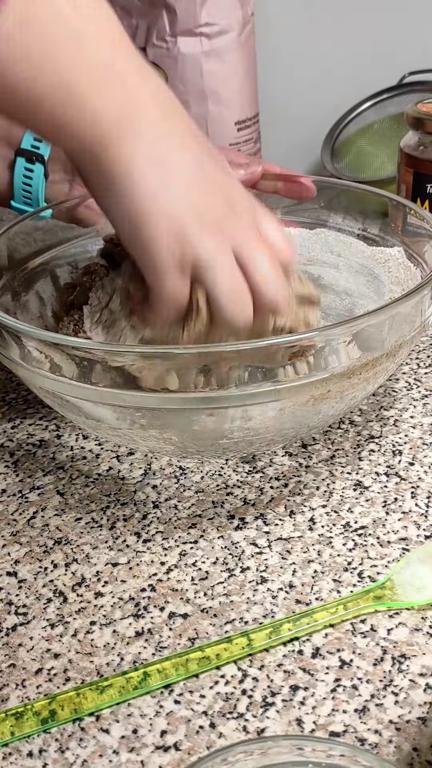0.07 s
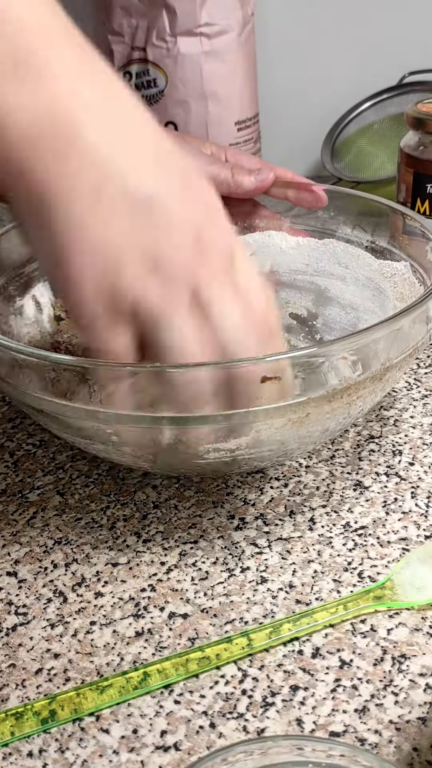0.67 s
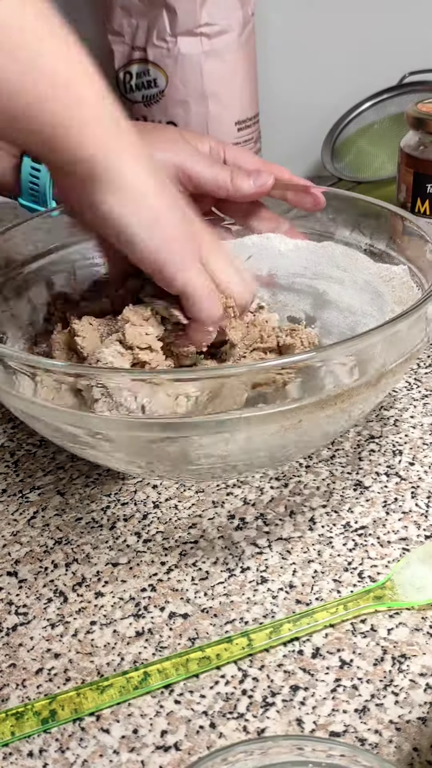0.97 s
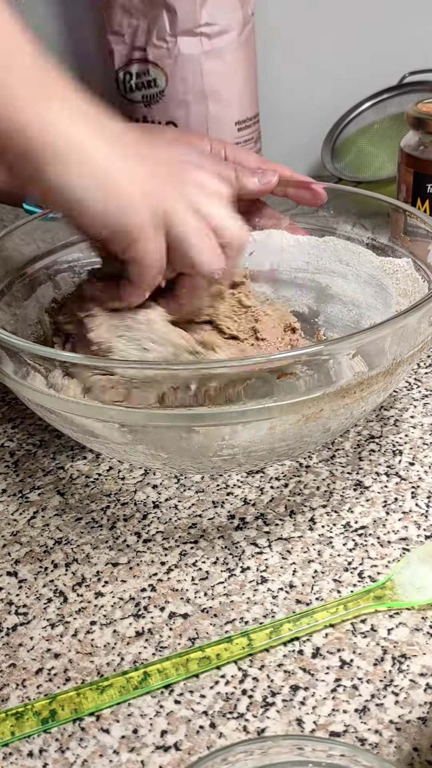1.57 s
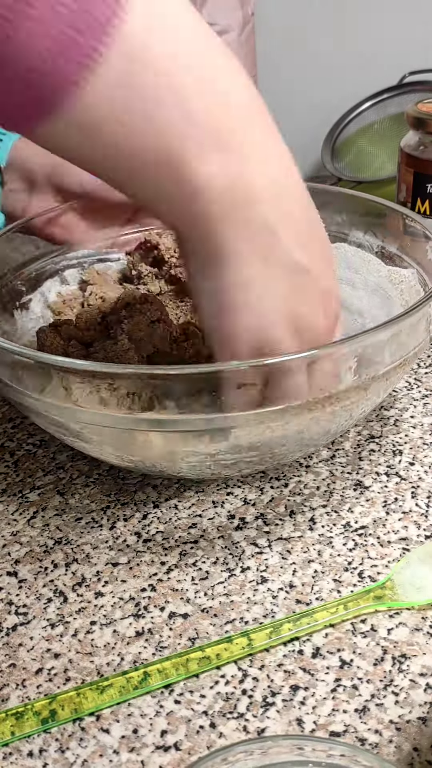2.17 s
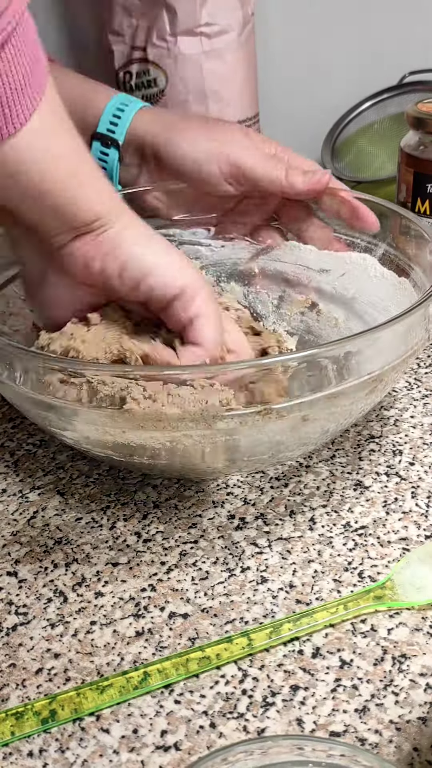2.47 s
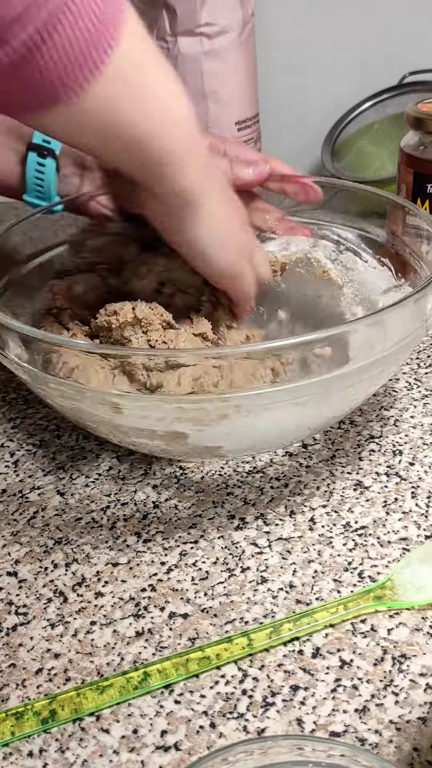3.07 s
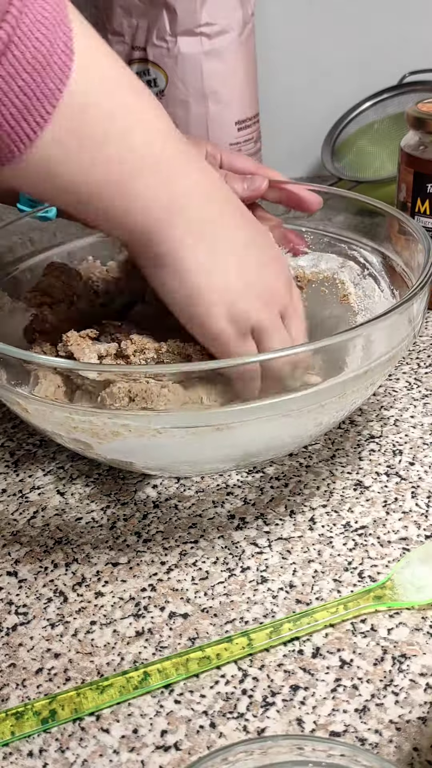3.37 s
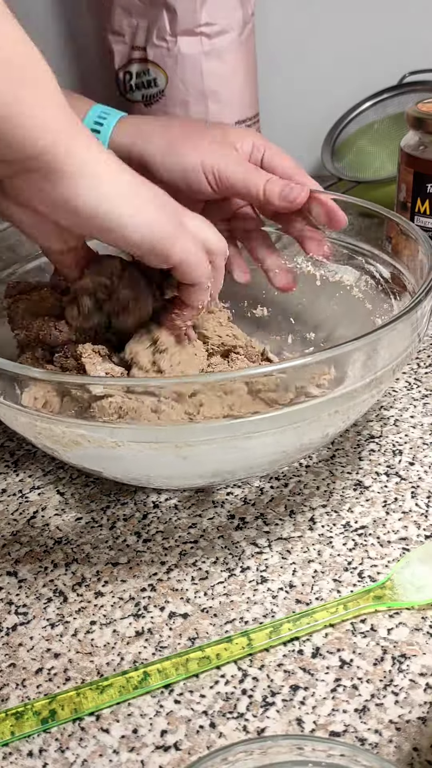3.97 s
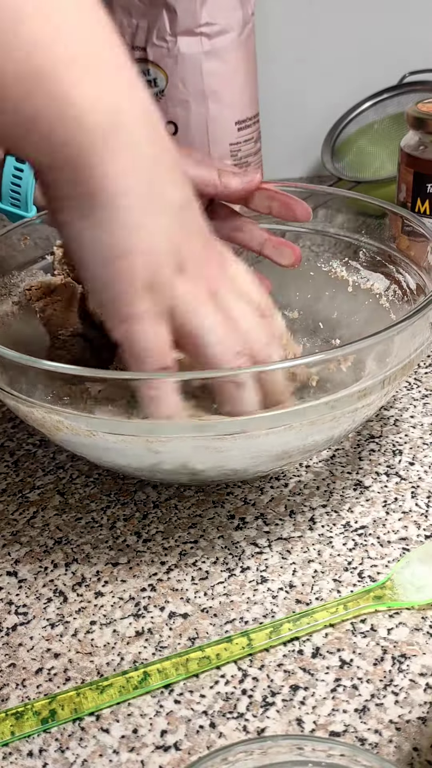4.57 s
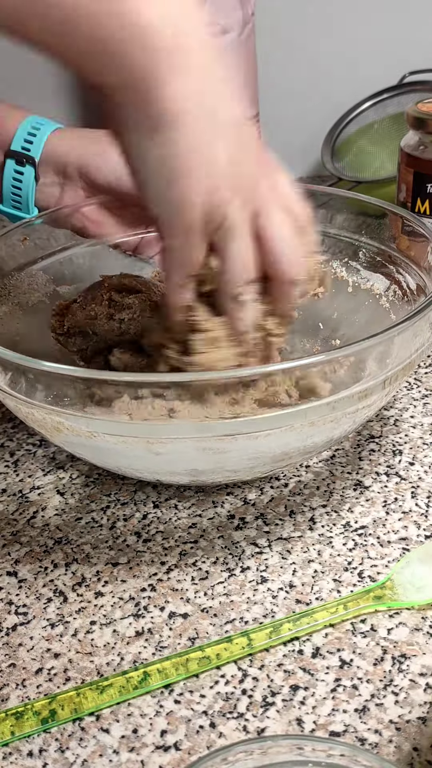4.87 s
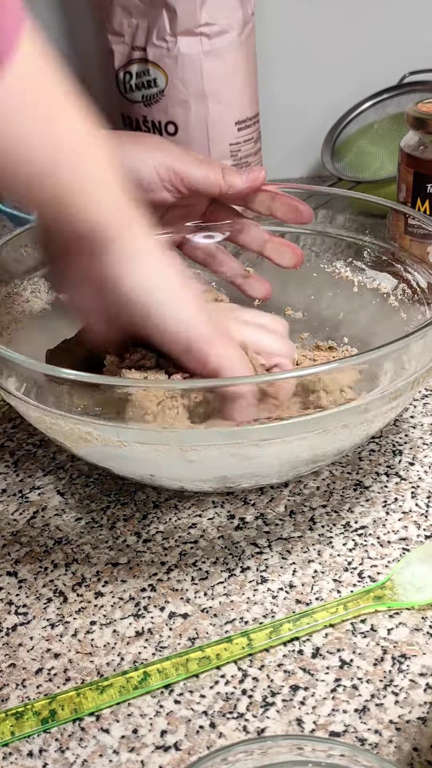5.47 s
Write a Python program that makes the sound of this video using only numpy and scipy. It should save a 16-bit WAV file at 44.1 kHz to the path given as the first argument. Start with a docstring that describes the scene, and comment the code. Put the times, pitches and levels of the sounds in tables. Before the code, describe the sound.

A hand kneads crumbly, floury dough in a glass bowl, close to the microphone in a small kitchen. Flour hisses and crumbs crunch softly between dull scuffs and thuds. About a second in, the bowl knocks hard on the stone counter with a brief squeak. Kneading continues over softer knocks, with one heavier thud, and a fingernail ticks sharply on the glass near the end. An appliance hums faintly throughout.

```python
"""Floury dough kneaded in a glass bowl on a stone counter, close to a stereo microphone in a small kitchen.
From the start an appliance hums faintly, flour hisses under the fingers, lumps scuff and thud, and
now and then a dry crust scrapes the glass. About a second in, the loaded bowl lands hard, squeaks on
the stone and rocks until it settles. The kneading goes on over softer knocks, with the heaviest
thud near 3.7 s. At five seconds, just before the end, a fingernail ticks sharply on the glass."""
import sys
import numpy as np
from scipy import signal
from scipy.fft import rfft, irfft, next_fast_len
from scipy.io import wavfile

SR = 44100
rng = np.random.default_rng(int(sys.argv[2]) if len(sys.argv) > 2 else 0)


def bounce(signal):
    """Save signal as a 16-bit WAV file at the path given by the first command-line argument."""
    frames = np.transpose(np.atleast_2d(signal))
    limited = np.clip(frames, -1, 1)
    pcm = np.round(limited * 32767).astype(np.int16)
    wavfile.write(sys.argv[1], SR, pcm)


N = 243431
TIME = np.arange(N) / SR

# Modes of the glass bowl, damped by dough and hand. Each row: frequency in Hz, relative level in dB,
# t60 in seconds before the extra damping of the top modes, left over right in dB.
BOWL_MODES = [(101, -12, 0.109, 0), (201, -12, 0.039, -1.5), (273.4, -9.5, 0.06, -1.5),
              (403.3, -11, 0.035, 1.5), (497.6, -16.0, 0.081, 5.5), (580, -12.5, 0.062, -0.5),
              (692, -12, 0.044, 4), (781, -8.0, 0.056, -4.5), (876, -13.0, 0.039, 0.5),
              (952, -17.5, 0.066, 0.0), (1084.6, -15, 0.047, 5.0), (1186, -14.5, 0.039, -0.5),
              (1340, -23.0, 0.05, 3), (1407, -17.0, 0.045, 4.0), (1520, -16, 0.028, -1.0),
              (1603, -15, 0.075, 1.0), (1748, -19.0, 0.067, 2.5), (1850, -18.0, 0.0735, 0),
              (1886, -23.5, 0.063, -0.5), (2020, -23.0, 0.054, 0.0), (2175, -25.5, 0.077, -1.5),
              (2284, -19, 0.041, -3.5), (2470, -23.5, 0.073, -1.0), (2630, -24, 0.053, -5.5),
              (2810, -24.5, 0.049, -6.5), (3041, -27.0, 0.039, 3.5), (3406, -26.5, 0.047, -4),
              (3810, -26.5, 0.067, -2)]
# How sound from the bowl divides at the microphone. Each row: frequency in Hz, left over right in dB.
MIC_BALANCE = [(2000, 1), (4400, -3), (6000, -8), (7200, -14), (8300, 1.5), (9000, 7), (10500, -1),
               (15000, 0.5)]


def amp(db):
    """Decibels to gain."""
    return 10 ** (np.asarray(db) / 20)


def unit(x):
    """Scales to rms 1."""
    return x / np.sqrt(np.mean(x ** 2) + 1e-20)


def read(points, hz):
    """Reads a table on a log-frequency axis."""
    f, value = np.transpose(points)
    return np.interp(np.log(hz + 1), np.log(f + 1), value)


def sides(db):
    """Left and right gains for a level difference."""
    return amp(np.array([[.5], [-.5]]) * db)


def colour(x, gain):
    """Filters by a gain that is a function of frequency."""
    size = next_fast_len(x.shape[-1], True)
    return irfft(rfft(x, size) * gain(np.fft.rfftfreq(size, 1 / SR)), size)[..., :x.shape[-1]]


def noise(gain):
    """Two unrelated channels of coloured noise."""
    return unit(colour(rng.standard_normal((2, next_fast_len(N, True))), gain)[:, :N])


def waver(rate_hz):
    """A smooth random curve of rms 1."""
    return unit(noise(lambda f: 1 / (1 + (f / rate_hz) ** 2))[0])


def add(mix, s, sound):
    """Mixes a sound in at time s."""
    part = mix[:, max(round(s * SR), 0):][:, :sound.shape[1]]
    part += sound[:, :part.shape[1]]


def swell(s, length):
    """A smooth rise and fall around time s."""
    return np.exp(-.5 * ((TIME - s) / length) ** 2)


def mode(t, hz, t60, rise_cycles=0.36, phase=0):
    """One vibration that builds up and dies away."""
    return np.sin(2 * np.pi * hz * t + phase) * (1 - np.exp(-t * hz / rise_cycles)) * 1000 ** (-t / t60)


def ring(spectrum, t60, size):
    """A dense stereo tail of energy 1, each band dying at its own speed."""
    hz, t, bands = signal.stft(rng.choice([-1., 1.], (2, size)), SR, nperseg=256)
    decay = amp(-60 * t / read(t60, hz)[:, None])
    tail = signal.istft(bands * decay, SR, nperseg=256)[1][:, :size]
    tail = colour(np.pad(tail, ((0, 0), (0, size))), lambda f: amp(read(spectrum, f)))[:, :size]
    return unit(tail) / np.sqrt(size)


def close_ports(x, corner_hz=700):
    """Long waves reach both microphone ports alike; short ones differ."""
    mid, side = x
    apart = colour(side, lambda f: f / np.hypot(f, corner_hz))
    return unit(np.array([mid + apart, mid - apart])) * np.sqrt(np.mean(x ** 2))


def room_tone(level_db=-57.5):
    """Steady kitchen air, nearly mono in the bass."""
    # The air at the microphone. Each row: frequency in Hz, then, table by table,
    # relative density in dB, likeness of the sides from 0 to 1, left over right in dB.
    spectrum = [(12, -36), (20, -10.5), (54, -12.5), (126, -3.5), (213, -20), (439, -19.5), (705, -22.5),
                (857, -31), (958, -24.5), (1230, -26.5), (4550, -38.5), (7310, -34), (8880, -37),
                (10500, -53.5), (15500, -58.5)]
    likeness = [(60, .93), (130, 0.99), (290, 1), (640, 0), (1400, 0), (15000, 0.084)]
    balance = [(60, 4.5), (110, 2.5), (200, 8.5), (380, 7.5), (700, 4.5), (1300, 0), (2400, -0.5),
               (15000, -8)]
    left, unrelated = noise(lambda f: amp(read(spectrum, f)))
    right = colour(left, lambda f: read(likeness, f))
    right += colour(unrelated, lambda f: np.sqrt(1 - read(likeness, f) ** 2))
    return amp(level_db) * unit(colour(np.array([left, right]), lambda f: sides(read(balance, f))))


def appliance_hum(gain_db=-1):
    """An appliance hums in narrow, wavering bands of noise."""
    # Lines of the hum. Each row: frequency in Hz, relative level in dB, half-width in Hz,
    # left over right in dB, lag of the right side in radians.
    lines = [(97.65, -75.5, 7.7, 1.5, 0), (147, -67.5, 14.6, 1, -0.5), (202, -69.5, 15.7, 0.5, 0.5),
             (274.6, -66.5, 10, 5.5, -1), (330, -70, 16, 11, 1), (408.4, -68, 19, 5, -0.8),
             (452, -66, 34, 5, -0.66), (521, -78.5, 11.5, 11, 0), (688, -64.5, 20, -0.5, -2.5),
             (957, -80, 14.7, 12.5, 2)]

    def response(f):
        total = 0
        for hz, db, width, pan, lag in lines:
            peak = amp(db) / np.sqrt(width) / (1 + ((f - hz) / width) ** 2)
            total += peak * sides(pan) * np.exp(1j * np.array([[0], [-lag]]))
        return total
    return amp(gain_db) * np.sqrt(SR / np.pi) * colour(rng.standard_normal(N), response)


def motor(hz=124, level_db=-58, wander_hz=3, wander_rate_hz=6, pan_db=3, swing_db=0.95, swing_rate_hz=5):
    """The core of the hum, wavering in pitch and level."""
    tone = np.sin(2 * np.pi * np.cumsum(hz + wander_hz * waver(wander_rate_hz)) / SR)
    return amp(level_db) * sides(pan_db) * unit(tone * amp(swing_db * waver(swing_rate_hz)))


def kitchen(direct, wet_db=-27):
    """Adds the short tail of the room, faint this close to the bowl."""
    # Decay of the room. Each row: frequency in Hz, t60 in seconds.
    decay = [(100, 0.39), (500, 0.28), (2000, 0.22), (8000, 0.03)]
    tail = close_ports(ring([(100, -10.0), (1000, -18.0), (10000, 0.5)], decay, size=20000))
    return direct + amp(wet_db) * signal.fftconvolve(direct, tail, axes=1)[:, :N]


def crust_scrapes(pan_db=-3, slips_per_s=6000, spread_db=2):
    """Dry crusts scrape crisply along the glass in quick runs of tiny slips."""
    # The scrapes. Each row: crest in seconds, level in dB, half-length in seconds.
    runs = [(0.376, -62, 0.021), (1.713, -61, 0.008), (1.88, -60, 0.015), (2.313, -69, .008),
            (2.528, -66, .009), (3.661, -44, 0.0042), (3.669, -48.5, 0.0092), (3.76, -61, .006),
            (3.828, -49, 0.0075), (4.56, -72, 0.012)]
    # Crust on glass. Each row: frequency in Hz, relative density in dB.
    spectrum = [(2500, -38), (3900, -15), (4700, 4), (5500, 1), (6500, 9), (7000, 4), (7300, 22), (7650, 0),
                (10000, -20), (15000, -28)]
    slips = rng.standard_normal((2, N)) * amp(spread_db * rng.standard_normal(N))
    slips *= rng.random(N) < slips_per_s / SR
    level = sum(amp(db) * swell(s, length) for s, db, length in runs)
    return sides(pan_db) * level * unit(colour(slips, lambda f: amp(read(spectrum, f))))


def bowl_gain(hz):
    """How strongly the glass answers at each frequency when it is rubbed."""
    powers = (1 / (1 + ((hz - f) * t60 * np.pi / np.log(1000)) ** 2) for f, _, t60, _ in BOWL_MODES)
    return np.sqrt(sum(powers))


def lump_scuffs(pan_db=4.5, width=0.61, drag_db=-69, swing_db=3, glass_db=7, cutoff_hz=1158.4):
    """Dough drags faintly over the glass and makes it ring; shoved lumps add short, dull rubs."""
    # The shoves. Each row: crest in seconds, level in dB, half-length in seconds.
    shoves = [(.205, -34.5, 0.012), (0.626, -55.5, 0.0061), (1.094, -41.5, 0.011), (1.297, -56, 0.029),
              (2.046, -67, 0.059), (2.214, -56.5, 0.028), (2.667, -48, 0.02), (2.736, -54, 0.012),
              (2.869, -50.5, 0.012), (3.058, -46.5, 0.019), (3.191, -53, 0.023), (3.498, -54.5, 0.01),
              (3.686, -32, 0.0092), (3.739, -54.5, 0.025), (3.842, -52.5, 0.014), (4.235, -55, 0.028),
              (4.546, -56.5, 0.014), (5.293, -54.5, 0.007), (5.478, -48.5, 0.0081)]
    # Dough on glass. Each row: frequency in Hz, relative density in dB.
    spectrum = [(40, -30), (110, 7), (210, 6.5), (400, -0.5), (520, -6), (720, -1.5), (1200, -10),
                (1700, -8.5), (2600, -13), (3400, -18), (6000, -13), (14000, -44.5)]
    mid, side = noise(lambda f: amp(read(spectrum, f)) * np.hypot(1, amp(glass_db) * bowl_gain(f)))
    drag = np.array([mid + width * side, mid - width * side])
    rub = lambda hz: unit(signal.lfilter(*signal.butter(1, hz, fs=SR), drag))
    out = amp(drag_db + swing_db * waver(rate_hz=7)) * rub(cutoff_hz)
    for s, db, length in shoves:
        shove_hz = cutoff_hz * 2 ** (-(db + 50) / 20)  # an octave duller for every 20 dB louder
        out += amp(db) * swell(s, length) * rub(shove_hz)
    return sides(pan_db) * out


def nail_tick(gain_db=15, t60=0.024, tail_db=-11, tail_t60=0.04, pan_db=-2):
    """A fingernail hits the glass: a dry, bright snap with a brief ring inside the bowl."""
    # Contacts of the nail. Each row: start in seconds, relative level in dB.
    contacts = [(5.0160, -28), (5.0163, -31.5)]
    # Nail on glass. Each row: frequency in Hz, relative density in dB.
    spectrum = [(600, -40), (1700, -7), (2600, -11), (5000, -6.5), (7300, 13), (9000, 1.5), (10500, -9),
                (15000, -31)]
    out = np.zeros((2, N))
    for s, db in contacts:
        snap = ring(spectrum, [(1000, t60)], size=4096)
        tail = ring(spectrum, [(1000, tail_t60)], size=4096)
        add(out, s, amp(db + gain_db) * (snap + amp(tail_db) * tail))
    return sides(pan_db) * out


def skid_squeak(start_s=0.958, level_db=-28, hz=6620, t60=0.045, pan_db=-3):
    """The glass skids on the stone after the hardest landing and gives a brief, thin note."""
    note = mode(np.arange(4096) / SR, hz, t60, rise_cycles=8)
    out = np.zeros((2, N))
    add(out, start_s, amp(level_db) * sides(pan_db) * note)
    return out


def rebounds(s, db, cutoff_hz, gap_s, loss_db, gap_growth=1.22, dulling=0.88):
    """The bowl settles in five ever weaker contacts: start in seconds, level in dB, cutoff in Hz."""
    k = np.arange(5)
    soft = k % 2  # it rocks: every other contact is on its softer side, longer and duller
    gaps = gap_s * gap_growth ** k * 1.37 ** soft
    cutoffs = cutoff_hz * dulling ** k * 0.26 ** soft
    return zip(s + np.cumsum(gaps) - gaps, db - loss_db * k ** 2, cutoffs)


def bowl_knocks(modes_db=-5, clatter_db=-2, damping_hz=4000, size=12000):
    """Each contact with the counter rings the bowl; a soft, long one leaves out the upper modes."""
    # Landings of the bowl. Each row: start in seconds, relative level in dB, cutoff in Hz,
    # seconds to the first rebound, loss at that rebound in dB.
    landings = [(0.1914, -26, 3400, 0.0044, 2), (0.2037, -26, 4500, 0.006, 12),
                (.222, -34, 1300, 0.0054, 0.5), (0.9423, 5, 7000, 0.0029, 2.1),
                (0.9703, -17, 1200, 0.0051, 2), (1.0766, -29, 1070, 0.0066, 0.7),
                (2.6645, -29, 380, 0.014, 3), (2.731, -33, 348, 0.0087, 8.5), (2.873, -42, 600, 0.0037, 1),
                (3.0493, -29, 650, 0.0036, 14), (3.2, -35, 520, .005, 6), (3.6785, -26.5, 1700, 0.004, 0.5),
                (5.184, -22, 111.3, 0.01, 2), (5.476, -36, 1220, 0.0025, 3.5)]
    # Dense ring of bowl and counter. Each row: frequency in Hz, then relative density in dB
    # in the first table, t60 in seconds in the second.
    clatter_spectrum = [(40, -14.5), (140, -7), (270, -14), (800, -12.5), (1600, -9), (3000, -9.5),
                        (3800, -7.5), (5000, -9.5), (6000, -6), (7800, 0), (9300, -1), (10200, -21),
                        (11400, -13), (12500, -22), (15000, -19)]
    clatter_decay = [(100, 0.29), (500, 0.15), (1500, 0.098), (4000, 0.0806), (12000, 0.068)]
    # The ring reaches the left port first. Each row: frequency in Hz, lead in radians.
    left_lead = [(100, .3), (270, .52), (500, 0.59), (800, 1.3), (1500, 1.3), (3000, 1.54)]
    t = np.arange(size) / SR
    modes = 0
    for k, (hz, db, t60, pan) in enumerate(BOWL_MODES):
        damped_t60 = t60 / np.hypot(1, hz / damping_hz)  # dough damps the top modes
        lag = np.array([[0], [-1]]) * read(left_lead, hz)
        polarity = (-1) ** k  # neighbours start in opposite directions
        modes += polarity * amp(db) * sides(pan) * mode(t, hz, damped_t60, phase=lag)
    out = np.zeros((2, N))
    for landing in landings:
        for s, db, cutoff_hz in rebounds(*landing):
            clatter = close_ports(ring(clatter_spectrum, clatter_decay, size))
            body = amp(modes_db) * modes + amp(clatter_db) * clatter
            cushion = signal.butter(2, cutoff_hz, fs=SR)
            add(out, s, amp(db) * signal.lfilter(*cushion, body))
    return colour(out, lambda f: sides(read(MIC_BALANCE, f)))


def dough_thuds(t60=0.032):
    """The hand lands on the dough: a low push that is over in a few cycles."""
    # Blows of the hand. Each row: start in seconds, level in dB, pitch in Hz.
    blows = [(0.2039, -17, 150), (1.0835, -33, 125), (1.0964, -33, 170), (1.3, -40, 205),
             (2.6644, -28, 205), (3.0553, -26.5, 210), (3.315, -36, 164), (3.678, -12, 178),
             (3.7045, -23, 122), (3.844, -37, 151), (5.195, -32, 155)]
    out = np.zeros((2, N))
    for s, db, hz in blows:
        add(out, s, amp(db) * mode(np.arange(4096) / SR, hz, t60)[None])
    return out


def stroke(t, length, build_share=0.46, crest_flatness=1.78):
    """A push of the hand that builds up to t = 0 and lets go."""
    from_crest = np.maximum(-t / build_share, t / (1 - build_share)) / length
    return np.exp(-np.minimum(from_crest, 20) ** crest_flatness)


def rest(t, length, delay_s=0.02, delay_share=0.36, rest_s=0.03, quick_s=0.054):
    """The share of rubbing that stops as the fingers let go of a quick squeeze; a long one slides on."""
    late = t - delay_s - delay_share * length
    return 1 / (1 + (late / rest_s) ** 4) / (1 + (length / quick_s) ** 4)


def patchy(x, depth_db, patch_s=0.099, patch_hz=500):
    """The rubbed spot keeps changing, so narrow bands swell and fade at random."""
    bands = signal.stft(x, SR, nperseg=256)[2]
    ripples_per_hz = np.fft.fftfreq(bands.shape[1], SR / 256)[:, None]
    ripples_per_s = np.fft.fftfreq(bands.shape[2], 128 / SR)
    smooth = np.exp(-(ripples_per_hz * patch_hz) ** 2 - (ripples_per_s * patch_s) ** 2)
    patches = unit(np.fft.ifft2(np.fft.fft2(rng.standard_normal(bands.shape[1:])) * smooth).real)
    return unit(signal.istft(bands * amp(depth_db * patches), SR, nperseg=256)[1][:, :N])


def flour(hiss_gain_db=1, grains_per_s=3500, spread_db=2, clump_db=1.35, flutter_db=2):
    """Tiny slips hiss while the hand moves; each squeeze adds more hiss and a crunch of crumbs."""
    # Squeezes of the fingers. Each row: crest in seconds, relative hiss level in dB,
    # length in seconds, offset of the crunch from that level in dB.
    squeezes = [(0.068, -56.5, 0.023, -25), (0.201, -52.5, 0.022, -11), (0.267, -53.5, 0.032, -16),
                (0.383, -57.5, 0.062, -8), (0.626, -55, 0.019, -3.5), (0.773, -58, 0.054, -12.5),
                (1.009, -55, 0.017, -16), (1.099, -52, 0.054, -9.5), (1.326, -58.5, 0.031, -10.5),
                (1.491, -52, 0.035, -16.5), (1.579, -61.5, 0.013, -7.5), (1.64, -66.5, 0.098, -9),
                (1.714, -48.5, 0.02, -19), (1.74, -55, 0.015, -10), (1.872, -56, 0.086, -12),
                (2.096, -56.5, 0.031, -6.5), (2.206, -57.5, 0.033, -5), (2.25, -60.5, 0.028, -6),
                (2.316, -53, 0.057, -15), (2.531, -55.5, 0.043, -8), (2.66, -62.5, 0.11, -4.5),
                (2.935, -56, 0.031, -13), (3.081, -60, 0.063, -7), (3.197, -59, 0.026, -10),
                (3.256, -59, 0.043, -9.5), (3.41, -62.5, 0.12, -6), (3.664, -43.5, 0.02, -9.5),
                (3.698, -55, 0.039, -1.5), (3.756, -56.5, 0.028, -11), (3.826, -52, 0.03, -7),
                (4.107, -59.5, 0.02, -8), (4.251, -60, 0.078, -4.5), (4.541, -56, 0.048, -7),
                (4.816, -56.5, 0.12, -14.5), (5.069, -51, 0.032, -12), (5.215, -61, 0.07, -7),
                (5.502, -54, 0.029, -7)]
    # Smooth rubbing is narrow, breaking crumbs broad. Each row: frequency in Hz, relative density in dB.
    hiss_spectrum = [(1500, -42), (3500, -21.5), (5300, -16), (6300, -11.5), (7200, -3), (8000, -2.5),
                     (8900, -5), (9800, -19), (11000, -24.5), (15000, -24.5)]
    crumb_spectrum = [(800, -11.5), (2000, 4), (4800, -1.5), (7000, -0.5), (9500, -5.5), (11000, -7),
                      (15000, -14)]
    t = TIME[::64]
    moving, hiss_power, crunch_power = 1, 0, 0
    for s, db, length, crunch_db in squeezes:
        push = amp(2 * db) * stroke(t - s, length)
        hiss_power += push
        crunch_power += amp(2 * crunch_db) * push
        moving *= 1 - rest(t - s, length)
    level = lambda power, steady_db: np.interp(TIME, t, np.sqrt(power + (amp(steady_db) * moving) ** 2))
    at_mic = lambda spectrum: lambda f: amp(read(spectrum, f)) * sides(read(MIC_BALANCE, f))
    hiss = patchy(noise(at_mic(hiss_spectrum)), depth_db=2.5) * level(hiss_power, steady_db=-67)
    sizes = amp(spread_db * rng.standard_normal(N) + clump_db * waver(rate_hz=70))  # crumbs go in clumps
    grains = rng.standard_normal((2, N)) * sizes * (rng.random(N) < grains_per_s / SR)
    crunch = patchy(colour(grains, at_mic(crumb_spectrum)), depth_db=4)
    crunch *= level(crunch_power, steady_db=-77)
    flutter = amp(flutter_db * waver(rate_hz=45))  # the fingers catch and let go
    return (amp(hiss_gain_db) * hiss + crunch) * flutter


def scene():
    """Bowl, dough and flour close to the microphone, with the kitchen and its hum behind."""
    bowl = bowl_knocks() + skid_squeak()
    kneading = dough_thuds() + lump_scuffs() + crust_scrapes() + flour() + nail_tick()
    return kitchen(bowl + kneading) + room_tone() + appliance_hum() + motor()


def record(dry):
    """The recorder rounds off the highest peaks and cuts the top of the treble."""
    ceiling, edge_hz = 0.95, 15600
    rounded = dry / (1 + (dry / ceiling) ** 8) ** (1 / 8)
    lowpass = signal.firwin(511, edge_hz, window=("kaiser", 9), fs=SR)
    return signal.oaconvolve(rounded, lowpass[None], "same")


dry = scene()
out = record(dry)
bounce(out)
```